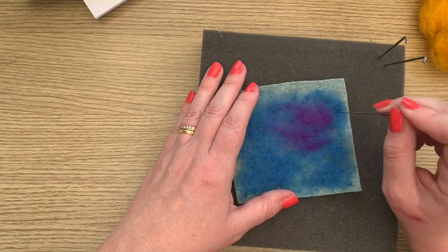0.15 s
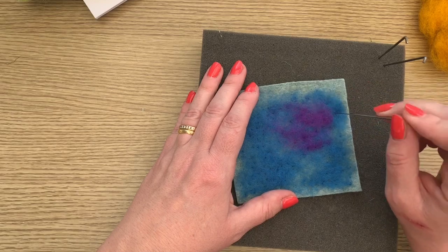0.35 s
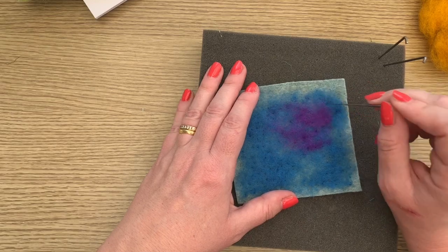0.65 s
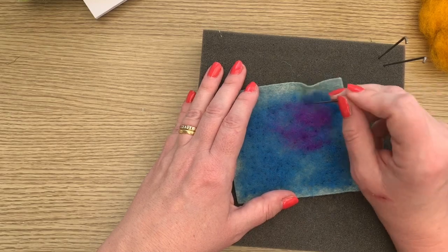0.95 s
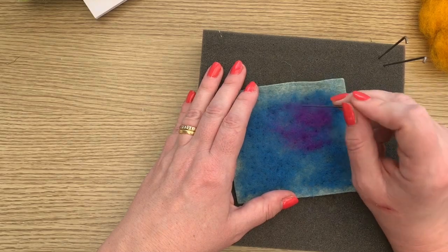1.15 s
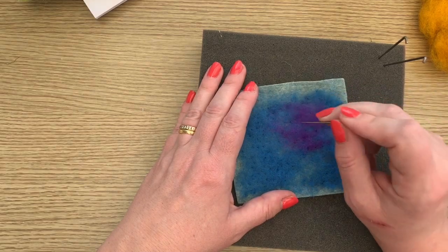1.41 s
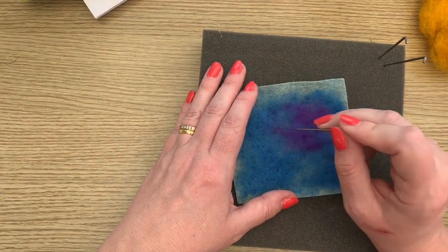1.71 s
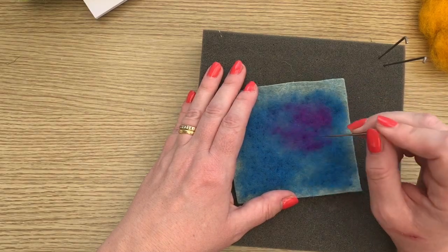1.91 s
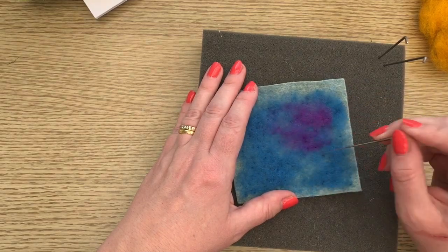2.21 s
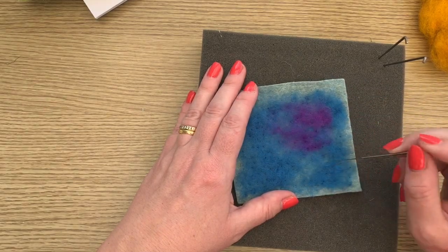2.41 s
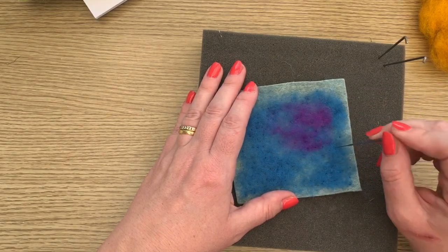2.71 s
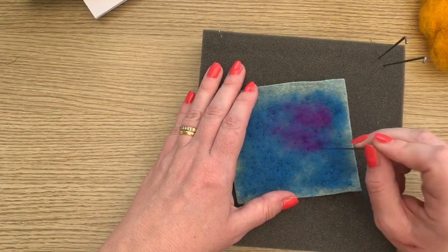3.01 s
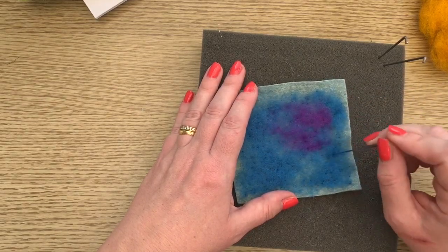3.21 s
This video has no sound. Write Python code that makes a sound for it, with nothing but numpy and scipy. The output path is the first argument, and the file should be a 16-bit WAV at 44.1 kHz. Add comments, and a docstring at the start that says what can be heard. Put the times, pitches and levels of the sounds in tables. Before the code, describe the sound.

A felting needle rapidly stabs wool on a foam mat, crisp popping taps in even rhythm.

```python
"""Needle felting on a desk

A barbed felting needle is stabbed through wool into a foam mat on a desk, nearly six times a second.
Each stab rustles in (noise of tiny fibre slips), pops through the foam in one or two jerks (falling tones,
ringing modes and noise snaps) that thump the mat and desk, crunches, and rasps out again, at times with a tick.
A small room answers with noise tails. Behind lie low rumble, hiss, faint high chirps and an early wavering whine,
made of noise bands. Two close microphones hear it from one side."""
import sys
import numpy as np
from scipy import signal
from scipy.fft import rfft, irfft, next_fast_len
from scipy.io import wavfile
from scipy.ndimage import map_coordinates

SR = 44100
rng = np.random.default_rng(int(sys.argv[2]) if len(sys.argv) > 2 else 0)


def inscribe(sig):
    """Save sig as 16-bit PCM at rate SR to the path in sys.argv[1].

    A 1-D sig is mono; a 2-D sig holds one channel per row.
    Samples are clipped to [-1, 1] before scaling.
    """
    pcm = np.round(np.clip(np.atleast_2d(sig).T, -1, 1) * 32767)
    wavfile.write(sys.argv[1], SR, pcm.astype(np.int16))


N = 147735  # length in samples

# Background rumble and hiss. Each row: frequency in Hz, relative level in dB per Hz.
FLOOR_SPECTRUM = [(25, -24), (63, 15.5), (85, 6.5), (300, -11), (600, -34), (3000, -22.5), (16000, -27)]
FLOOR_DB = -71
# Tones of the faint whine. Each row: pitch in Hz, relative level in dB.
WHINE_TONES = [(310, -1.5), (1080, -1.5), (1550, -0.5), (1850, -2.5)]
# How the whine sinks. Each row: time in seconds, level in dB.
WHINE_LEVEL = [(0, -62), (.38, -61), (.8, -85.5)]
WHINE_WIDTH_HZ, WAVER_HZ, WAVERS_PER_S = 110, 45, 12
# Faint chirps. Each row: start in seconds, length in seconds, start pitch in Hz, end pitch in Hz, level in dB.
CHIRPS = [(1.485, 0.12, 3570, 3280, -63.5), (1.68, .19, 3450, 3600, -66), (3.018, 0.16, 3010, 2600, -66.5),
          (3.256, 0.13, 3370, 2570, -72)]
CHIRP_WIDTH_HZ = 81
# Likeness of left and right in spread-out noise. Each row: frequency in Hz, correlation (1 is identical).
LIKENESS = [(250, 0.84), (2500, 0.011)]
# Dying away of the room. Each row: frequency in Hz, time to fall by 60 dB in seconds.
ROOM_T60 = [(100, 0.25), (2000, 0.22), (15000, 0.11)]
# Strength of the room's answer. Each row: frequency in Hz, level in dB.
ROOM_LEVEL = [(700, -5), (3000, -11.5), (10000, -15.5)]
ROOM_BUILD_S = 0.0026
# Phase by which the left microphone leads the right. Each row: frequency in Hz, lead in radians.
LEFT_LEAD = [(0, 0), (450, -.35), (730, -1.4), (980, 0), (1600, 0), (4750, 3.14), (15200, 19)]
# How much louder the left microphone is than the right. Each row: frequency in Hz, difference in dB.
LEFT_BALANCE = [(60, -2.5), (600, 3.5), (900, -2.3), (5000, 0.5)]
LOW_CUT_HZ, TOP_HZ = 42, 16100

# The stabs. Each row: start in seconds, crunch level in dB, crunch length in seconds,
# thump of the mat in dB, push on the desk in dB.
STABS = [(.075, -51, 0.019, -45, -48.5), (.24, -50, .014, -36.5, -44), (0.417, -43.5, 0.012, -37.5, -43.5),
         (0.577, -49, 0.021, -37.5, -41.5), (0.767, -44, 0.013, -44.5, -37.5),
         (0.939, -46.5, 0.015, -44.5, -46.5), (1.112, -50, 0.0049, -34, -40),
         (1.283, -42, 0.0088, -40.5, -51), (1.464, -41, 0.012, -46.5, -45),
         (1.63, -47.5, 0.0267, -38, -48.5), (1.804, -46.5, 0.0178, -38.5, -50.5),
         (1.978, -47.5, 0.01, -47, -43.5), (2.145, -45.5, 0.023, -38.5, -43.5),
         (2.333, -46.5, .016, -35.5, -46.5), (2.494, -51, 0.015, -43.5, -55),
         (2.671, -45.5, 0.021, -45.5, -49), (2.87, -43.5, 0.015, -39.5, -54.5),
         (3.048, -60, .012, -48.5, -51), (3.195, -73.5, 0.014, -53.5, -70)]
# Low ringing modes of the desk. Each row: pitch in Hz, relative level in dB, time to fall by 60 dB in seconds.
DESK_MODES = [(144.4, -0.5, 0.24), (188.3, -2, 0.35), (211.7, 2.5, 0.097), (331, -2.5, 0.18)]
DESK_ATTACK_S = 0.0062
# The mat sounds higher as the needle moves to its middle. Each row: time in seconds, pitch in Hz.
MAT_PITCH = [(1.3, 281.3), (1.63, 411), (2.15, 282)]
MAT_SWELL_S = 0.015  # time to the peak of the thump
# Barbs snagging on the way out. Each row: start in seconds, level in dB.
SNAGS = [(0.472, -51.5), (1.338, -57.5), (2.027, -57), (2.194, -45.5), (2.377, -49.5), (2.544, -54.5),
         (2.917, -53.5)]
SNAG_HZ, SNAG_T60_S = 1790, 0.02
# Noise of pressing the wool. Each row: frequency in Hz, relative level in dB per Hz.
PRESS_SPECTRUM = [(100, -5), (300, 5), (1600, -9), (16000, -27)]
# Noise of crunching in. Each row: frequency in Hz, relative level in dB per Hz.
CRUNCH_SPECTRUM = [(300, 10), (1600, 6.5), (2500, -3.5), (6600, -7), (8800, -14.5), (11000, -11.5),
                   (16000, -9.5)]
# Noise of rasping out. Each row: frequency in Hz, relative level in dB per Hz.
RASP_SPECTRUM = [(250, 10), (600, 0), (2000, -7), (4500, -14.5), (16000, -35.5)]
FIBRES_PER_S, FIBRE_SPREAD_DB = 3500, 3.5
PRESS_RISE_S, CRUNCH_RELEASE_S = 0.0087, 0.0022
PULL_DELAY_S, PULL_WIDTH_S = 0.051, 0.02
RASP_BASE_DB, RASP_PER_PUSH_DB = -40.5, 0.32  # rasp level at a 0 dB push; dB added per dB of push
CLUMP_DB, CLUMPS_PER_S = 3, 220
# Moments when the foam gives way. Each row: start in seconds, thud level in dB, snap level in dB.
POPS = [(.078, -35.5, -40.5), (.2453, -29.5, -32), (.417, -33.5, -34), (.5789, -26, -35),
        (.7657, -26.5, -26.5), (0.9481, -43, -33.5), (1.102, -45.5, -58), (1.1158, -27, -35),
        (1.29, -42.5, -34.5), (1.466, -32.5, -30), (1.4726, -30.5, -67), (1.6334, -31, -44),
        (1.6387, -32, -29), (1.805, -27.5, -37), (1.977, -27, -38.5), (1.985, -28, -67), (2.1468, -23, -30),
        (2.1551, -41.5, -29.5), (2.334, -27.5, -31), (2.4895, -51, -38), (2.498, -39.5, -48),
        (2.665, -42, -37.5), (2.675, -31.5, -57),  (2.88, -39, -31), (3.0527, -34.5, -27),
        (3.199, -45, -53)]
# Ringing modes of the knock. Each row: pitch in Hz, relative level in dB, time to fall by 60 dB in seconds.
KNOCK_MODES = [(557.4, -13.5, 0.13), (730, -16.5, 0.091), (1095, -9.5, 0.027), (1390, -6, 0.014),
               (1820, -16.5, 0.023), (6420, -21.5, 0.014)]
# Noise of the snap. Each row: frequency in Hz, relative level in dB per Hz.
SNAP_SPECTRUM = [(200, 9), (1200, 6), (6400, 3.5), (8800, 1.5), (16000, -11)]
SNAP_T60_S = 0.0046
THUD_START_HZ, THUD_END_HZ = 1456, 164.4  # the pitch falls towards the second value
THUD_FALL_S, THUD_T60_S, THUD_ATTACK_S = 0.001331, .04, 0.0022


def amp(db):
    """Turn decibels into a gain."""
    return 10 ** (np.asarray(db) / 20)


def unit(x):
    """Scale to an average strength (rms) of 1."""
    return x / np.sqrt(np.mean(x ** 2) + 1e-20)


def along(points, hz):
    """Read a curve of (Hz, value) points, with frequency on a log scale."""
    f, v = np.transpose(points)
    return np.interp(np.log(hz + 1), np.log(f + 1), v)


def over_time(points, s):
    """Read a curve of (first column, value) points along straight lines."""
    return np.interp(s, *np.transpose(points))


def fade(t, t60):
    """Die away smoothly, by 60 dB in t60 seconds."""
    return np.exp(-np.log(1000) * t / t60)


def filtered(x, response):
    """Change the strength and phase of each frequency in x."""
    m = next_fast_len(N + SR // 2)
    hz = np.fft.rfftfreq(m, 1 / SR)
    return irfft(rfft(x, m) * response(hz), m)[..., :x.shape[-1]]


def coloured(x, spectrum):
    """Shape x with a spectrum and scale it to rms 1."""
    return unit(filtered(x, lambda hz: amp(along(spectrum, hz))))


def add(track, s, sound):
    """Mix a sound into a track at time s."""
    part = track[max(round(s * SR), 0):][:len(sound)]
    part += sound[:len(part)]


def wobble(per_s):
    """Draw a smooth random curve through per_s random points a second."""
    points = rng.standard_normal(int(N * per_s / SR) + 2)
    return map_coordinates(points, [np.arange(N) * per_s / SR])


def diffuse(size):
    """Make stereo noise, alike in the bass and nearly unrelated in the treble."""
    def mid_side(hz):
        angle = np.arccos(np.clip(along(LIKENESS, hz), -1, 1)) / 2
        return np.array([np.cos(angle), np.sin(angle)])
    mid, side = filtered(rng.standard_normal((2, size)), mid_side)
    return np.array([mid + side, mid - side])


def fuzzy_tone(pitch_hz, width_hz):
    """Make a narrow band of stereo noise with soft skirts that follows a pitch."""
    def band(hz):
        return 1 / np.hypot(1, 2 * hz / width_hz) / np.hypot(1, hz / (10 * width_hz))
    slow_noise = unit(filtered(rng.standard_normal((2, N)), band))
    return slow_noise * np.sin(2 * np.pi * np.cumsum(pitch_hz) / SR)


def ring(modes, t, scatter_db):
    """Ring fading tones whose levels differ a little at each strike."""
    out = np.zeros(len(t))
    for hz, db, t60 in modes:
        level = amp(db + scatter_db * rng.standard_normal())
        out += level * fade(t, t60) * np.sin(2 * np.pi * hz * t)
    return out


def fibres(spectrum):
    """Tiny slips of fibres over the barbs: random clicks of uneven size, shaped by a spectrum."""
    size = amp(FIBRE_SPREAD_DB * np.minimum(rng.exponential(size=N), np.pi))
    slips = rng.random(N) < FIBRES_PER_S / SR
    return coloured(slips * size * rng.standard_normal(N), spectrum)


def whine():
    """A faint cluster of noise bands whose pitches waver and which soon sinks away."""
    out, now = np.zeros((2, N)), np.arange(N) / SR
    level_db = over_time(WHINE_LEVEL, now)
    for hz, db in WHINE_TONES:
        pitch = hz + WAVER_HZ * wobble(WAVERS_PER_S)
        out += amp(level_db + db) * fuzzy_tone(pitch, WHINE_WIDTH_HZ)
    return out


def chirps():
    """Faint fuzzy tones that glide in pitch while they swell and fade."""
    out, now = np.zeros((2, N)), np.arange(N) / SR
    for s, length, start_hz, end_hz, db in CHIRPS:
        progress = np.clip((now - s) / length, 0, 1)
        pitch = start_hz + (end_hz - start_hz) * progress
        out += amp(db) * np.sin(np.pi * progress) * fuzzy_tone(pitch, CHIRP_WIDTH_HZ)
    return out


def background():
    """Steady rumble and hiss of shaped noise, with the whine and the chirps."""
    return amp(FLOOR_DB) * coloured(diffuse(N), FLOOR_SPECTRUM) + whine() + chirps()


def room(x):
    """The small room answers each stab with its own short noise tail, fading at a rate set by frequency."""
    out, size = np.zeros((2, N)), SR // 2
    # cut the sound halfway between stabs
    middles = [round((a[0] + b[0]) / 2 * SR) for a, b in zip(STABS, STABS[1:])]
    edges = [0] + middles + [N]
    for a, b in zip(edges, edges[1:]):
        hz, t, noise = signal.stft(diffuse(size), SR, nperseg=256)
        shape = fade(t, along(ROOM_T60, hz)[:, None]) * (1 - np.exp(-t / ROOM_BUILD_S))
        energy = size * np.mean(shape ** 2, axis=1, keepdims=True)
        shape *= amp(along(ROOM_LEVEL, hz))[:, None] / np.sqrt(energy)
        tails = signal.istft(noise * shape, SR, nperseg=256)[1]
        for channel, tail in zip(out, tails):
            add(channel, a / SR, signal.fftconvolve(x[a:b], tail))
    return out


def microphones(x):
    """The direct sound differs in level and phase, by frequency, between the left and right microphones."""
    half = np.array([[.5], [-.5]])  # each side takes half the difference

    def response(hz):
        return amp(half * along(LEFT_BALANCE, hz)) * np.exp(1j * half * over_time(LEFT_LEAD, hz))
    return filtered(x, response)


def desk():
    """Each stab pushes the desk through the soft mat and sets its low modes ringing."""
    out, t = np.zeros(N), np.arange(SR // 2) / SR
    soft_start = 1 - np.exp(-t / DESK_ATTACK_S)
    for s, *_, push_db in STABS:
        add(out, s, amp(push_db) * ring(DESK_MODES, t, scatter_db=2) * soft_start)
    return out


def mat():
    """The soft mat takes the stroke: a dull thump that swells and dies within a few cycles."""
    out, t = np.zeros(N), np.arange(SR // 5) / SR
    swell = (t / MAT_SWELL_S * np.exp(1 - t / MAT_SWELL_S)) ** 4
    for s, _, _, thump_db, _ in STABS:
        pitch = over_time(MAT_PITCH, s)
        add(out, s, amp(thump_db) * swell * np.sin(2 * np.pi * pitch * t))
    return out


def snags():
    """A barb catches a tuft as the needle is pulled out: a small dry tick of resonant noise."""
    level, t = np.zeros(N), np.arange(SR // 10) / SR
    for s, db in SNAGS:
        add(level, s, amp(db) * fade(t, SNAG_T60_S))

    def resonance(hz):
        return hz / (SNAG_HZ ** 2 - hz ** 2 + .5j * hz * SNAG_HZ)
    return level * unit(filtered(rng.standard_normal(N), resonance))


def barbs():
    """Friction of each stroke: pressing the wool, crunching in, rasping out; harder pushes rasp more."""
    press, crunch, pull = np.zeros((3, N))
    for s, crunch_db, length, _, push_db in STABS:
        t = np.arange(N) / SR - s
        rasp = amp(RASP_BASE_DB + RASP_PER_PUSH_DB * push_db)
        press += rasp * (t < 0) * np.exp(-abs(t) / PRESS_RISE_S)  # grows up to the stab
        crunch += amp(crunch_db) * (t >= 0) * np.exp(-np.maximum(t - length, 0) / CRUNCH_RELEASE_S)
        pull += rasp * np.exp(-.5 * ((t - PULL_DELAY_S) / PULL_WIDTH_S) ** 2)
    # the rasp crackles as its level wobbles quickly
    rasp_noise = unit(fibres(RASP_SPECTRUM) * amp(CLUMP_DB * wobble(CLUMPS_PER_S)))
    return press * fibres(PRESS_SPECTRUM) + crunch * fibres(CRUNCH_SPECTRUM) + pull * rasp_noise


def pops():
    """The foam gives way: a sharp noise snap, a ringing knock and a short thud of falling pitch."""
    tones, snaps, t = np.zeros(N), np.zeros(N), np.arange(SR // 5) / SR
    pitch = THUD_END_HZ + (THUD_START_HZ - THUD_END_HZ) / (1 + t / THUD_FALL_S)
    thud_level = (1 - np.exp(-t / THUD_ATTACK_S)) * fade(t, THUD_T60_S)
    thud = thud_level * np.sin(2 * np.pi * np.cumsum(pitch) / SR)
    snap_level = fade(t, SNAP_T60_S) * (1 - np.exp(-20 * t / SNAP_T60_S))
    for s, thud_db, snap_db in POPS:
        add(tones, s, amp(thud_db) * thud)
        knock_db = (thud_db + snap_db) / 2
        add(tones, s, amp(knock_db) * ring(KNOCK_MODES, t, scatter_db=2.5))
        add(snaps, s, amp(snap_db) * snap_level)
    return tones + snaps * coloured(rng.standard_normal(N), SNAP_SPECTRUM)


def scene():
    """Needle, mat and desk, heard directly and through the room, over the background."""
    felting = desk() + mat() + snags() + barbs() + pops()
    return background() + room(felting) + microphones(felting)


def record(dry):
    """Weaken the deepest bass and remove everything from the top frequency up."""
    def response(hz):
        u = 1j * hz / LOW_CUT_HZ
        low_cut = u * u / (u * u + np.sqrt(2) * u + 1)
        return (hz < TOP_HZ) * low_cut
    return filtered(dry, response)


dry = scene()
out = record(dry)
inscribe(out)
```